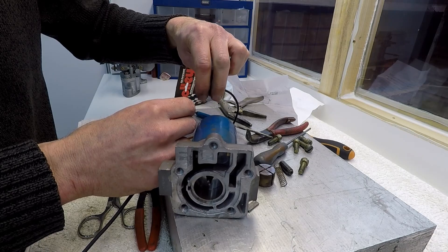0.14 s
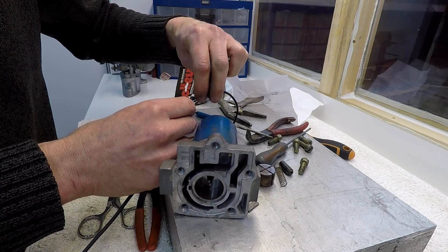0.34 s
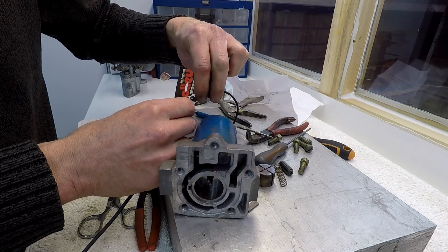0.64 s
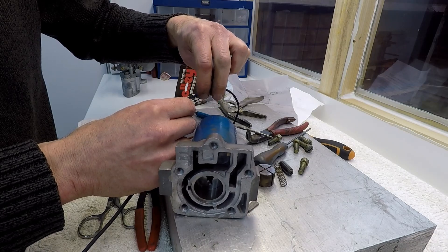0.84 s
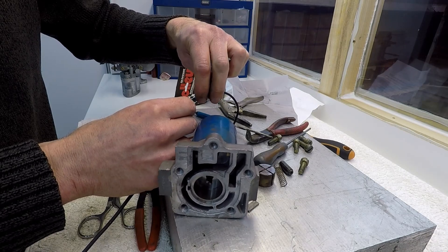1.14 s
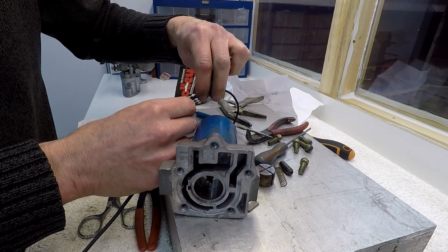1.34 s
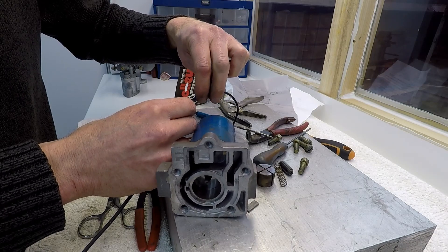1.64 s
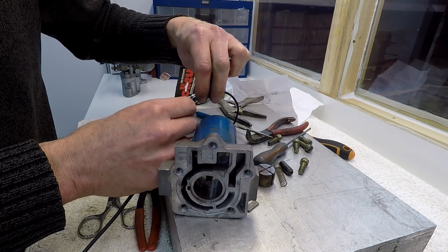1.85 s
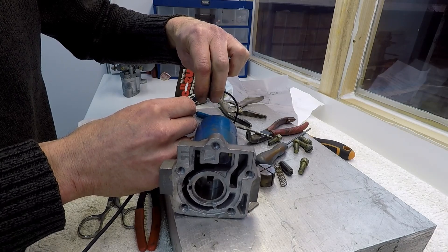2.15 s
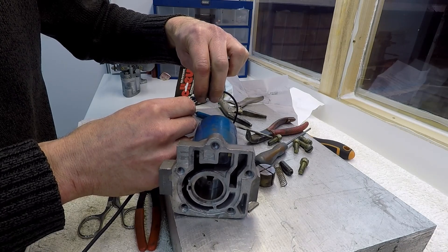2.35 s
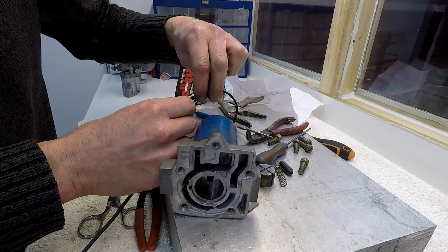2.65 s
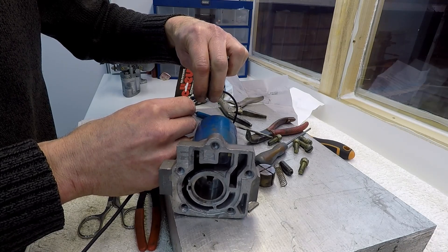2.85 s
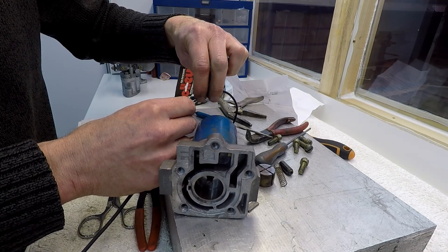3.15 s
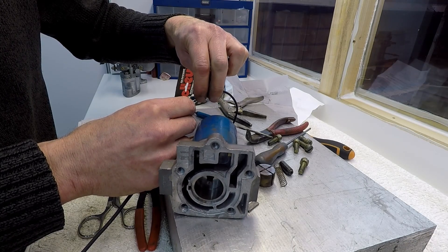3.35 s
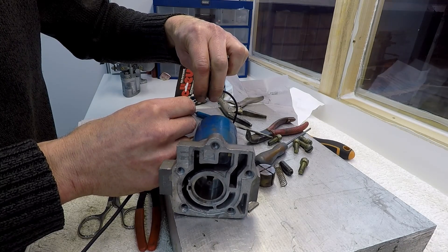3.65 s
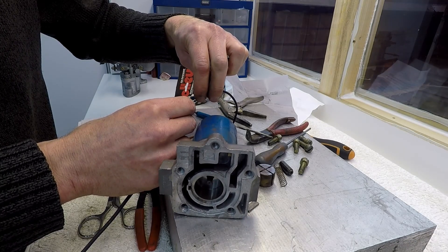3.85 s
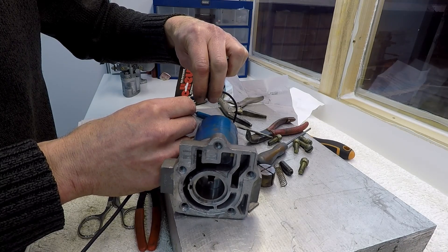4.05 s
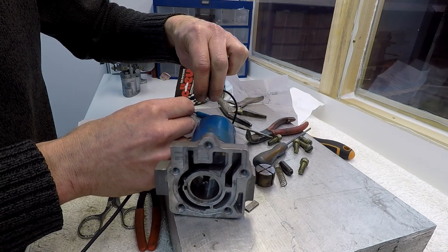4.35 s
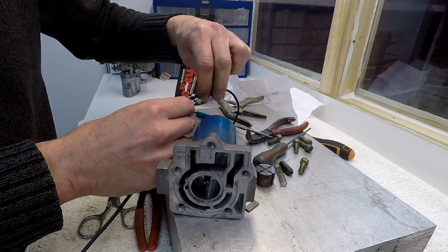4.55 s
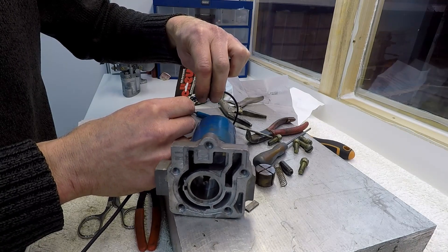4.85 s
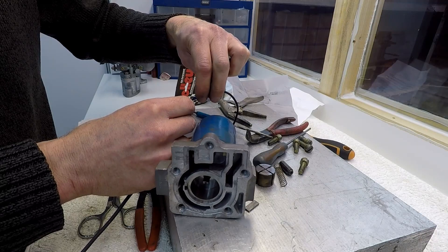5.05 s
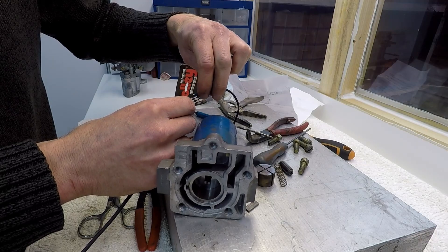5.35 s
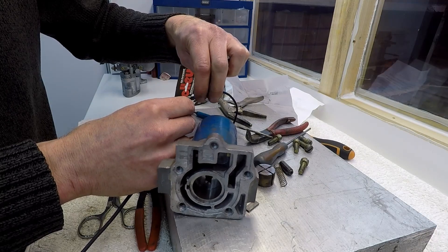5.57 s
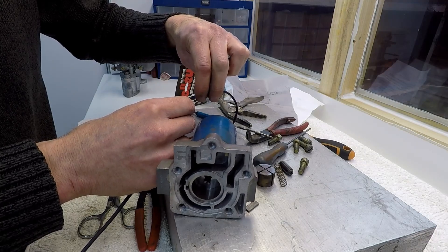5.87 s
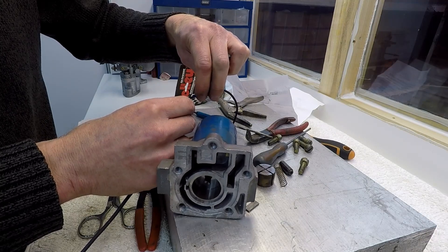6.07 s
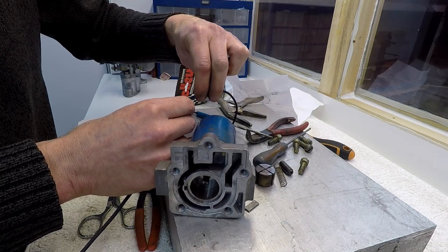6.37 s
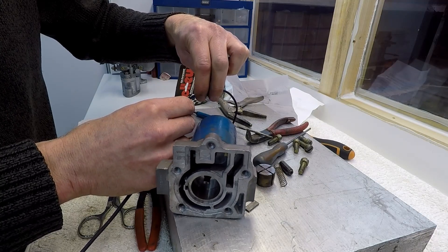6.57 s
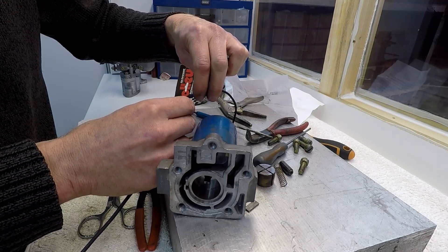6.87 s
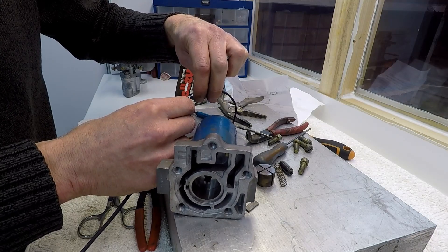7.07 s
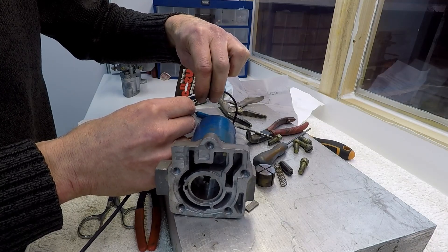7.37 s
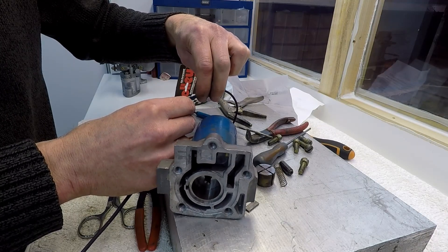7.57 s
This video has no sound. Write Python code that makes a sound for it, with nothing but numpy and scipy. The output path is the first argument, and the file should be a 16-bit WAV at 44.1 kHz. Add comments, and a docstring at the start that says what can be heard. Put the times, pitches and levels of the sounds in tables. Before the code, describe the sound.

Short gritty motor bursts, a steady two-and-a-half-second whirr, then more brief spurts, with housing knocks on a workbench and faint room hiss.

```python
"""A low rumble and faint hiss fill a workshop, then a soft thud comes from a workbench, heard close on a camera's
microphone pair. A small electric pump motor is touched on and off with loose leads: short spurts, one long run.
Rumble and hiss are coloured noise; thuds and clicks are blows that ring modes of bench and housing, the bench
shaking the pair in nearly opposite phase. Brushes and bearings rasp in a noise pattern read once per shaft turn."""
import sys
import numpy as np
from scipy import signal
from scipy.fft import rfft, irfft, next_fast_len
from scipy.io import wavfile
from scipy.ndimage import uniform_filter1d, map_coordinates

SR = 44100
rng = np.random.default_rng(int(sys.argv[2]) if len(sys.argv) > 2 else 0)


def file_out(sig):
    """Save sig as 16-bit WAV at sys.argv[1]."""
    # one column per channel
    cols = np.atleast_2d(sig).T
    # limit, then scale
    lim = np.clip(cols, -1, 1)
    pcm = np.round(lim * 32767).astype(np.int16)
    wavfile.write(sys.argv[1], SR, pcm)


N = 340011
OPPOSED = np.array([[1], [-1]])  # signs of the left and right port


def undb(db):
    """Decibels to gain."""
    return 10 ** (np.asarray(db) / 20)


def level(x, db):
    """Scale to an rms level."""
    return x * undb(db) / np.sqrt(np.mean(x ** 2))


def curve(rows, column=1, quiet=None):
    """A table column joined by straight lines in time; quiet is its value outside the table."""
    rows = np.array(rows)
    return np.interp(np.arange(N) / SR, rows[:, 0], rows[:, column], quiet, quiet)


def colour(x, points):
    """Filter by a spectrum of (f/Hz, level/dB) points, joined along log frequency."""
    size = next_fast_len(N)
    hz, db = np.transpose(points)
    bins_hz = np.arange(1, size // 2 + 2) * SR / size
    gain = undb(np.interp(np.log(bins_hz), np.log(hz), db))
    return irfft(rfft(x, size) * gain, size)[..., :N]


def walk(rate):
    """Random levels held 1 / rate s and slewed twice; spread near 1."""
    hold = int(SR / rate)
    steps = np.repeat(rng.standard_normal(N // hold + 1), hold)
    return 1.04 * uniform_filter1d(uniform_filter1d(steps, hold), hold)[:N]


# slow level of the rumble, before its lumps: t/s, level/dB
RUMBLE_LEVEL = [(0, -25.5), (.3, -30.5), (1.5, -27.5), (2.2, -28.5), (2.5, -28), (3.4, -36), (3.9, -47),
                (4.3, -31.5), (6., -31), (7., -32.5), (7.71, -33.5)]
# surges of the rumble that go with jolts of the housing: t/s, relative level/dB
RUMBLE_SURGES = [(.4, -17.5), (1., -18), (1.62, -18), (4.9, -24), (5.55, -19), (6.2, -22), (6.52, -40),
                 (7.25, -35)]
SURGE_RISE_S, SURGE_FALL_S = 0.015, 0.16  # time constants
LUMPY_DB, LUMPS_HZ = 3, 12.


def swell():
    """Strength of the rumble: slow level and surges add as powers, lumpy throughout."""
    t = np.arange(N) / SR
    power = undb(curve(RUMBLE_LEVEL)) ** 2
    for start, db in RUMBLE_SURGES:
        since = np.maximum(t - start, 0)
        surge = undb(db) * (1 - np.exp(-since / SURGE_RISE_S)) * np.exp(-since / SURGE_FALL_S)
        power = power + surge ** 2
    return np.sqrt(power) * undb(LUMPY_DB * walk(LUMPS_HZ))


# spectrum of the rumble: f/Hz, relative level per Hz/dB
RUMBLE_SPECTRUM = [(18, -48), (30, -3.5), (42, 5), (60, -4), (100, -10.5), (200, -28), (300, -47),
                   (500, -76.5)]
# spectra of the shop floor noise, alike and opposed in the two ports: f/Hz, relative level per Hz/dB
FLOOR_ALIKE = [(50, -2.5), (100, -0.5), (150, -8), (200, -3), (260, -14), (400, -17.5), (700, -25),
               (2000, -31), (4800, -38.5), (6500, -33), (8000, -36.5), (10500, -38.5), (12500, -47),
               (14700, -57)]
FLOOR_OPPOSED = [(12, -20), (25, -4), (80, 0), (120, -12), (200, -9.5), (400, -14), (900, -15.5),
                 (2000, -28.5), (4800, -42.5), (6500, -32.5), (10500, -38), (12500, -47), (14700, -54)]
ALIKE_DB, OPPOSED_DB = -44, -45  # rms
# a faint tone that swells and fades: t/s, f/Hz, rms level/dB
FAINT_TONE = [(6.55, 346, -66), (6.6, 347, -59), (6.67, 349, -48.5), (6.8, 348.5, -52),
              (6.86, 349.5, -58.5), (7.12, 352.5, -61), (7.17, 353, -66)]


def shop():
    """Wandering rumble and steady hiss from coloured noise, and a faint gliding sine."""
    rumble = level(colour(rng.standard_normal(N), RUMBLE_SPECTRUM), 0) * swell()
    alike = level(colour(rng.standard_normal(N), FLOOR_ALIKE), ALIKE_DB)
    opposed = level(colour(rng.standard_normal(N), FLOOR_OPPOSED), OPPOSED_DB)
    tone_phase = 2 * np.pi * np.cumsum(curve(FAINT_TONE)) / SR
    tone = np.sqrt(2) * undb(curve(FAINT_TONE, column=2, quiet=-120)) * np.sin(tone_phase)
    return rumble * undb(-.6 * OPPOSED) + alike + OPPOSED * opposed + tone


def ring(times, db, modes, push_s, scrape, favour_hz=1000., slope_db=0):
    """Bell-shaped pushes (spread push_s), trailed by a short scrape, ring the modes, most those near the pitch
    that the point of contact favours; each port has its own gain and phase."""
    t = np.arange(2048) / SR
    push_s = np.reshape(push_s, (-1, 1))
    push = np.exp(-.5 * (t / push_s - 3) ** 2) / (push_s * SR * np.sqrt(2 * np.pi))
    grit = rng.standard_normal((len(times), len(t))) * np.exp(-t / 0.012)
    blows = push + scrape * signal.fftconvolve(push[:, :512], grit, axes=1)[:, :len(t)]
    out = np.zeros((2, N))
    for hz, mode_db, t60, pan_db, lead in modes:
        force = np.zeros(N + len(t))
        octaves_away = np.abs(np.log2(hz / favour_hz))
        for start, gain, blow in zip(times, undb(db - slope_db * octaves_away), blows):
            first = int(start * SR)
            force[first:first + len(t)] += gain * blow
        pole = np.exp((2j * np.pi * hz - np.log(1000) / t60) / SR)
        ringing = signal.lfilter([1], [1, -pole], force[:N])
        port_gain = undb(mode_db + OPPOSED * pan_db / 2)
        out += port_gain * (ringing * np.exp(.5j * lead * OPPOSED)).imag
    return out


# housing rocks softly on the bench: t/s, ring level/dB, thump level/dB, all relative
SOFT_THUDS = [(.009, -58, -17), (.078, -41, -27), (.416, -37.5, -18.5), (1.078, -33, -20),
              (1.297, -35.5, -29), (1.647, -38, -15), (1.739, -33.5, -12.5), (1.944, -40, -16.5),
              (2.45, -36, -19.5), (4.059, -33.5, -27), (4.234, -34, -16.5), (4.933, -32.5, -19),
              (5.145, -39, -30), (5.595, -33, -17.5), (5.835, -37, -21), (6.27, -31, -12),
              (6.498, -36, -16), (7.276, -28.5, -20.5)]
# metal edge meets the bench: t/s, click level/dB, favoured f/Hz, fall-off away from it/dB per octave,
# ring level/dB, thump level/dB, all levels relative
EDGE_CLICKS = [(.098, -46, 860, 9, -62, -47), (.440, -32.5, 550, 3, -42, -17),
               (.468, -42.5, 550, 1.5, -34.5, -22), (.562, -36.5, 760, 1, -34, -14),
               (0.634, -41.5, 571, 3.5, -34, -13), (.738, -43, 770, 3, -46, -17),
               (1.138, -35, 765, 3, -35.5, -17.5), (1.326, -38.5, 766, 19, -55, -26),
               (1.692, -32.5, 850, -1, -33, -15.5), (1.793, -36.5, 744, 17, -35, -43),
               (1.970, -38.5, 780, 18, -59, -40), (2.463, -39, 780, 16, -58, -35),
               (4.135, -30.5, 1200, 3, -31, -26), (4.188, -35, 550, 3, -28, -42),
               (4.213, -38, 600, 2, -57, -20.5), (4.301, -35.5, 700, 0, -33, -31),
               (4.333, -38, 550, 7, -34, -38), (4.371, -38.5, 560, 10.5, -39, -19),
               (4.394, -44, 780, 9, -36.5, -18), (4.475, -38, 1410, 2, -37.5, -18),
               (4.648, -46, 850, 14, -49, -33), (5.014, -35, 1410, 7, -35.5, -20),
               (5.188, -38.5, 870, 12, -46, -27.5), (5.686, -34, 1600, 2.5, -31, -16),
               (5.859, -41, 560, 4, -60, -18.5), (6.222, -41, 540, 8, -41, -23),
               (6.346, -32.5, 1750, 2, -34.5, -15.5), (6.525, -37.5, 860, 8, -60, -37),
               (7.362, -30, 1720, 2.5, -30.5, -17.5)]
# modes of bench (thump), its panel (ring) and motor housing (click):
# f/Hz, relative level/dB, t60/s, left minus right/dB, left leads/rad
BENCH_MODES = [(59.5, -7, 0.18, 2, 2.8), (70.27, 5, 0.56, -4.5, 2.84), (88.44, -0.5, 0.57, -4, 2.85),
               (107, -4, 0.13, -5, 3.23), (138.9, -0.5, 0.34, -9, 2.92), (155.2, -4.5, 0.26, -11, 2.08)]
PANEL_MODES = [(214.4, 3.5, 0.24, -9.5, 2.9), (259, -1, 0.042, -31, 2.04), (305.7, 19.5, 0.25, 2.5, 2.79),
               (366.6, -0.5, 0.2, -21, 2.8), (415.5, -1, 0.13, -15.5, 1.77)]
HOUSING_MODES = [(555, -5.5, 0.032, -20, 0.58), (636, -7.5, 0.021, 1.5, 0.54), (770, -7, 0.038, -22, 2.3),
                 (854, -3.5, 0.036, -12, 1.15), (987, -12.5, 0.043, -12, 0.58),
                 (1255, -1, 0.015, -10, 0.51), (1424, -3.5, 0.031, -5, 0.32), (1705, -3.5, 0.021, -4, 0.38),
                 (1825, -5.5, 0.021, -5, 0.39), (1970, -10, 0.024, 5, 0.27), (2320, -16.5, 0.042, 3, 0.43),
                 (2880, -14, 0.13, -2, 1), (3370, -5.5, 0.021, 0, .2)]
KICK_RING_DB, KICK_THUMP_DB, KICK_LAG_S = -47.5, -28.5, .005  # the jolt of each start from rest
HARD_CONTACT_S, SOFTER_S_PER_DB = .00006, .000009  # taps with a narrower colour press longer


def knocks():
    """Thumps of the bench, ring of its panel and clicks of the housing, all struck modes."""
    on, held, _ = np.transpose(RASP_STRETCHES)
    rest_s = on[1:] - (on + held)[:-1]
    starts = on[np.r_[True, rest_s > .2]]
    kicks = [(start + KICK_LAG_S, KICK_RING_DB, KICK_THUMP_DB) for start in starts]
    click_jolts = [(c[0], c[4], c[5]) for c in EDGE_CLICKS]
    times, ring_db, thump_db = np.transpose(SOFT_THUDS + click_jolts + kicks)
    thumps = ring(times, thump_db, BENCH_MODES, .0018, .025)
    low = thumps + ring(times, ring_db, PANEL_MODES, .0007, .012)
    # a high-pass leaves the thuds with little below 45 Hz
    low = signal.sosfilt(signal.butter(2, 45, "high", fs=SR, output="sos"), low)
    times, db, favour_hz, slope_db = np.transpose(EDGE_CLICKS)[:4]
    contact_s = HARD_CONTACT_S + SOFTER_S_PER_DB * slope_db
    # make up what a longer push loses at the favoured pitch
    loss_db = 10 / np.log(10) * (2 * np.pi * favour_hz * contact_s) ** 2
    clicks = ring(times, db + loss_db, HOUSING_MODES, contact_s, 0.052, favour_hz, slope_db)
    return low, clicks


# stretches of rasp, some overlapping to build up one spurt: t/s, held/s, relative level/dB
RASP_STRETCHES = [(.365, 0.067, -42), (.964, 0.036, -43.5), (0.987, 0.019, -36.5), (1.59, 2.465, -39.5),
                  (4.074, 0.0087, -40.5), (4.107, 0.03, -44), (4.148, 0.02, -38.5), (4.187, 0.01, -40),
                  (4.308, .035, -45.5), (4.358, 0.012, -52), (4.824, 0.049, -44), (4.879, 0.015, -38.5),
                  (5.487, 0.025, -49), (5.515, 0.025, -41), (5.562, 0.0096, -44), (6.157, 0.048, -45.5),
                  (6.208, 0.015, -39), (7.17, 0.016, -47.5), (7.193, 0.034, -42.5), (7.25, 0.011, -46)]
RISE_S, FALL_DB_PER_S, SAG_DB_PER_S = 0.0083, 628, 1.15


def rasp_strength(t):
    """The strongest stretch at each time: a quick rise, a slight sag while held, then a steep fall."""
    out = np.zeros(N)
    for start, held, db in RASP_STRETCHES:
        on = np.clip(t - start, 0, held)
        off = np.maximum(t - start - held, 0)
        strength = undb(db - SAG_DB_PER_S * on - FALL_DB_PER_S * off)
        out = np.maximum(out, (1 - np.exp(-on / RISE_S)) ** 2 * strength)
    return out


# the shaft is held back at the start and by one slip, and recovers: t/s, turns per s lost before smoothing
SHAFT_SETBACKS = [(1.6, 3.2), (2.479, .6)]
FULL_TURNS_HZ, SPURT_TURNS_HZ = 44.22, 40.5
RECOVER_S, SETBACK_S = .25, .06  # time constant of recovery, smoothing of speed changes
SETTLED_FROM_S, SETTLED_TO_S = 1.79, 4.05  # the rotor runs true between these times


def shaft(t):
    """Turns per second: full speed less each setback in the long run, lower in the short spurts."""
    lost = sum(hz * (t > start) * np.exp(-np.maximum(t - start, 0) / RECOVER_S)
               for start, hz in SHAFT_SETBACKS)
    running = (t > SHAFT_SETBACKS[0][0]) & (t < SETTLED_TO_S + SETBACK_S)
    speed = np.where(running, FULL_TURNS_HZ - lost, SPURT_TURNS_HZ)
    return uniform_filter1d(speed, int(SETBACK_S * SR))


def rasp(turns, wear, size=4096, count=300):
    """Brush and bearing chatter of one turn, read at the shaft angle; the pattern wears into a new one as it goes."""
    angle = np.arange(size) / size
    # a scrape at each of seven commutator slots, strong over part of the turn
    slots = np.exp(-(7 * angle % 1) / 1.3)
    gate = slots * undb(3.5 * np.cos(2 * np.pi * angle) + 1.5 * np.cos(2 * np.pi * 3 * angle))
    order = np.arange(size // 2 + 1)
    lower = order < 108  # this band beats half as deep and peaks later in the turn
    grit = rng.standard_normal((count, size))
    orders = np.where(lower, rfft(grit * np.sqrt(gate)), rfft(grit * gate))
    orders /= np.abs(orders) ** .5  # neighbouring orders are of like strength
    orders *= np.exp(-2j * np.pi * .4 * order * lower)
    table = irfft(orders * (order < 350), size)
    table = np.concatenate([table, table[:, :1]], axis=1) / table.std()
    row = wear.astype(int) % (count - 1)
    mix = (wear % 1) * np.pi / 2
    at = (turns % 1) * size
    old = map_coordinates(table, [row, at], order=1)
    new = map_coordinates(table, [row + 1, at], order=1)
    return np.cos(mix) * old + np.sin(mix) * new


# resonances of the motor casing: f/Hz, width/Hz, lift level/dB
CASING_RESONANCES = [(2840, 50, 8), (3210, 60, 4), (3590, 50, 7), (4000, 300, 4), (4490, 120, 5),
                     (5280, 80, 6), (5520, 80, 6), (5830, 70, 5), (6065, 90, 11), (6330, 90, 9),
                     (6585, 80, 11), (6920, 90, 5), (7450, 70, 7), (7810, 70, 5), (8880, 90, 5)]


def casing(x):
    """The casing's resonances lift the rasp above its broad colour."""
    size = next_fast_len(N)
    hz = np.arange(size // 2 + 1) * SR / size
    lift = 1 + sum((undb(db) - 1) / (1 + (2 * (hz - f) / width) ** 2) for f, width, db in CASING_RESONANCES)
    return irfft(rfft(x, size) * lift, size)[:N]


# colour of the rasp, alike and opposed in the two ports: f/Hz, relative level per Hz/dB
RASP_ALIKE = [(500, -19), (800, -18.5), (2000, -16.5), (2650, -15), (2900, -10), (3600, -7), (4550, -5),
              (4800, -19), (5150, -8.5), (6300, -1), (7000, -2.5), (8200, -18.5), (9000, -13.5),
              (13000, -22.5), (14400, -38)]
RASP_OPPOSED = [(500, -40), (800, -24), (1100, -9), (2500, -14.5), (4400, -51), (4900, -8), (6200, 1.5),
                (7200, -2.5), (8800, -1.5), (11700, -30), (14700, -35)]
# the right port hears more of the upper treble: f/Hz, left minus right level/dB
TREBLE_TILT = [(2000, -1.5), (7000, 0.3), (8500, -6.5), (10500, -5), (12500, 1)]
# hum through the bench: shaft order/turns, relative level/dB
BENCH_HUM = [(1, -0.5), (2, -15), (3, -42), (5, -10), (6, -15), (7, -7), (22, -50), (24, -19)]
# a low throb at shaft rate swells until 2.45 s, then fades: t/s, level/dB before wandering
LOW_THROB = [(1.8, -48), (2.25, -38), (2.45, -21.5), (2.9, -33), (3.4, -36), (3.8, -44), (4.05, -47)]
SWAY_HZ, SWAY_TOP_S, SWAY = 6.1, 3.37, 0.0026  # the speed sways by this fraction as the housing rocks


def motor():
    """Stretches of rasp in the air; sines locked to the shaft make the bench hum and a low throb."""
    t = np.arange(N) / SR
    speed = shaft(t)
    sway = SWAY * np.cos(2 * np.pi * SWAY_HZ * (t - SWAY_TOP_S))
    turns = np.cumsum(speed * (1 + sway + .0005 * walk(20))) / SR
    settled = (t > SETTLED_FROM_S) & (t < SETTLED_TO_S)
    wear = np.cumsum(np.where(settled, 1.8, 40.)) / SR  # new patterns per s
    strength = rasp_strength(t)
    # steady noise roughens the repeating pattern
    alike = colour(casing(rasp(turns, wear) + .3 * rng.standard_normal(N)), RASP_ALIKE)
    opposed = colour(casing(rasp(turns, wear) + .3 * rng.standard_normal(N)), RASP_OPPOSED)
    hum = sum(undb(db + 4.4 * walk(5.59)) * np.sin(2 * np.pi * (order * turns + rng.random()))
              for order, db in BENCH_HUM)
    air = strength * (level(alike, 4.54) + OPPOSED * level(opposed, -0.25))
    air = np.array([colour(port, [(hz, sign * db / 2) for hz, db in TREBLE_TILT])
                    for port, sign in zip(air, (1, -1))])
    throb_gain = np.sqrt(2) * undb(curve(LOW_THROB, quiet=-120) + 1.7 * walk(14.))
    throb = throb_gain * np.sin(2 * np.pi * turns)
    # the hum is heard only while the rotor runs true
    bench_hum = settled * uniform_filter1d(strength, 4000) * hum * (OPPOSED + 0.28)
    return air, bench_hum + throb


def scene():
    """Air-borne sounds get the room's short tail; all the others reach the ports dry."""
    air, hum = motor()
    thuds, clicks = knocks()
    t = np.arange(SR // 2) / SR
    tail = rng.standard_normal((2, len(t))) * np.exp(-np.log(1000) * t / 0.18) * (t > .004)
    wet = signal.fftconvolve(air + clicks, level(tail, -52.5), axes=1)[:, :N]
    return air + clicks + wet + hum + thuds + shop()


TOP_HZ = 14500


def record(dry):
    """The camera cuts the top with a steep low-pass."""
    return signal.sosfilt(signal.ellip(10, .2, 70, TOP_HZ, fs=SR, output="sos"), dry)


dry = scene()
out = record(dry)
file_out(out)
```